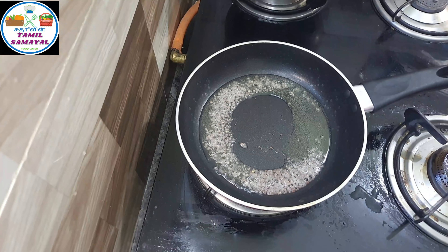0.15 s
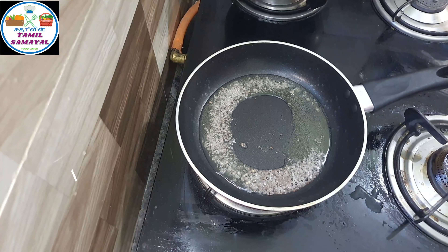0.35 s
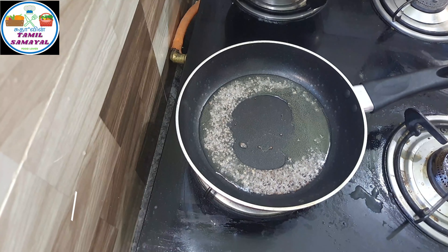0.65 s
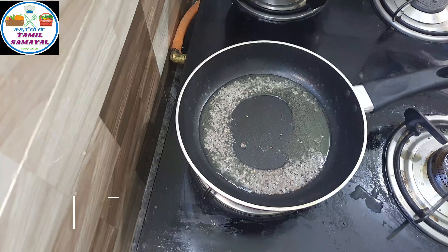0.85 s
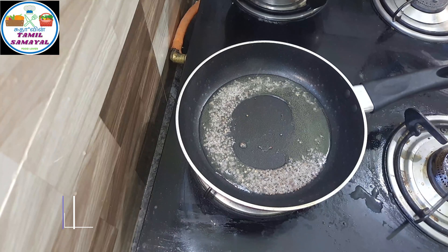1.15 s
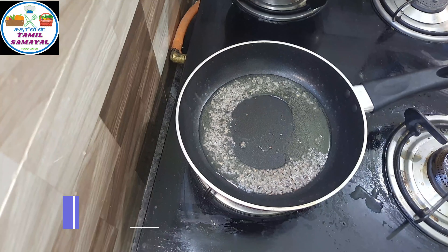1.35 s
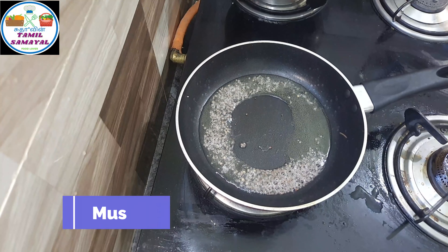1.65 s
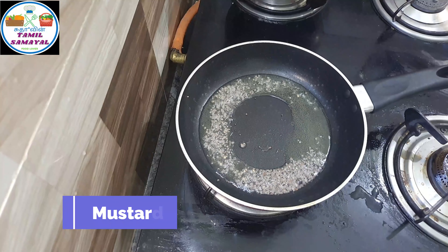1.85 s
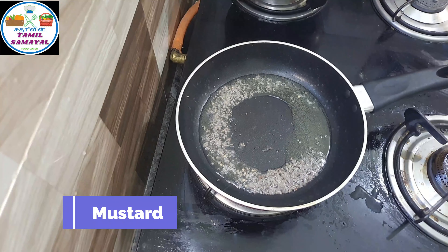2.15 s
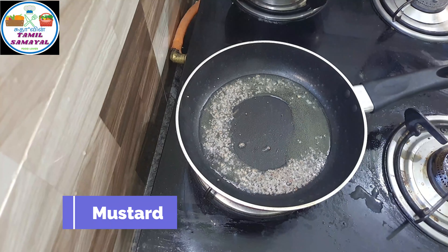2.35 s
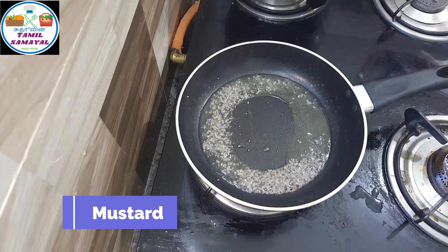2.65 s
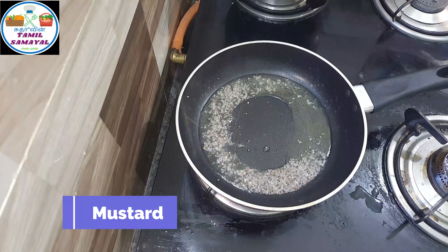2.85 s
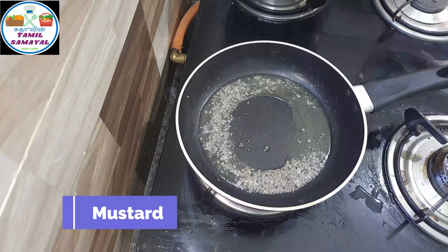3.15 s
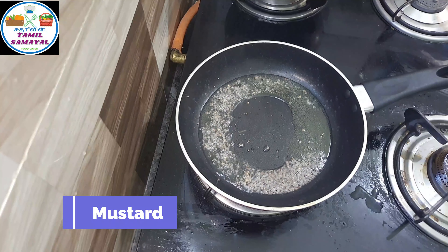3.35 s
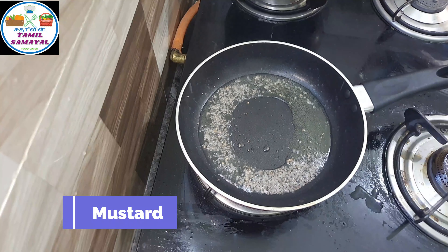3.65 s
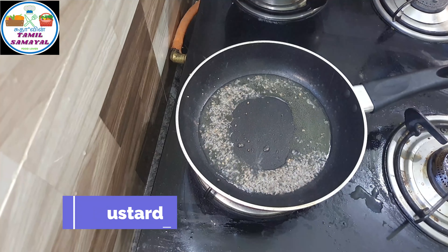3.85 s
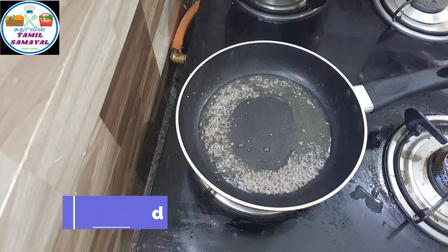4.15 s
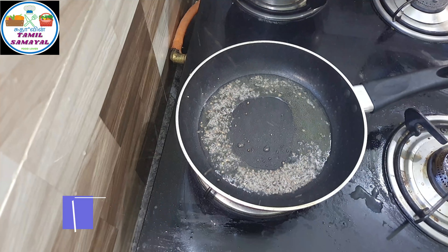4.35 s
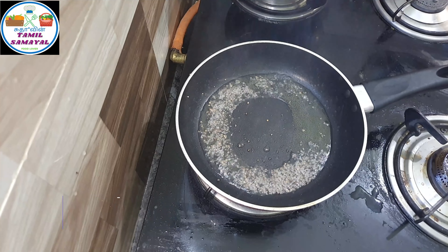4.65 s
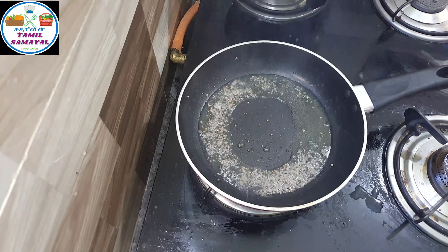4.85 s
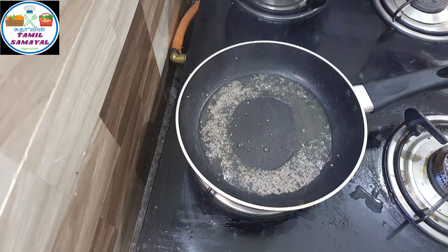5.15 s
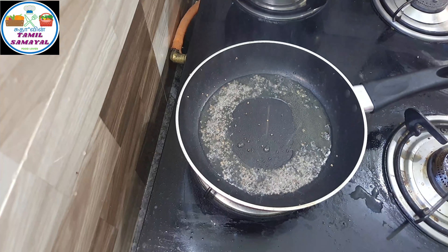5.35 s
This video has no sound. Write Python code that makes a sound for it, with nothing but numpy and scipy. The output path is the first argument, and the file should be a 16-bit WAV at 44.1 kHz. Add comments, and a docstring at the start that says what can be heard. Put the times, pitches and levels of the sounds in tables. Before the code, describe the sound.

In a small, hard-surfaced kitchen, seeds in hot oil start with isolated, brittle pops, a utensil clink near the start and a louder metallic clatter just after one second. The pops come faster through the middle, then merge from about three seconds into dense, loud crackling with oil spits and tiny bubbly plips. Each snap has a short bright room echo. A barely audible burner hums behind. Close phone microphone, identical left and right.

```python
"""Mustard seeds burst in hot oil in a frying pan, close to a phone in a small hard-walled kitchen.
Seeds and crackle: coloured noise snaps, from lone pops to a busy crackle as the oil heats; pops make the oil spit.
Bubbles: short damped sines. Seeds and bubbles echo in decaying noise; the crackle shares one such echo.
Behind: knocked utensils and pan (resonant noise), oil specks on the microphone (tick and thud),
the burner's faint hum and hiss (shaped noise). A fast limiter holds the sharpest peaks."""
import sys
import numpy as np
from scipy import signal
from scipy.fft import rfft, irfft
from scipy.io import wavfile
from scipy.ndimage import uniform_filter1d, minimum_filter1d

SR = 44100
rng = np.random.default_rng(int(sys.argv[2]) if len(sys.argv) > 2 else 0)


def pcm_store(signal):
    """Save signal as 16-bit PCM."""
    levels = np.round(np.clip(np.atleast_2d(signal), -1, 1) * 32767)
    wavfile.write(sys.argv[1], SR, levels.astype(np.int16).T)


N = 242766
# loudest bursting seeds: (time [s], nominal energy per ms [dB], snap pitch [Hz],
# relative room share [dB], high when it bursts away from the phone)
SEED_POPS = [(0.0096, -38.5, 11000, 3.5), (0.0967, -29.5, 15000, -1), (0.1721, -14, 10600, 2),
             (0.4608, -35.5, 7000, 10), (0.535, -40, 11000, 4), (0.6066, -40, 10500, -7),
             (0.667, -44, 6000, 2), (0.6828, -11.0, 6100, -6), (0.712, -20, 4050, 4.5),
             (0.8005, -9.5, 10400, -4), (0.9223, -35.5, 15000, 2), (0.9563, -22.5, 11800, 0),
             (1.0661, -36.5, 14000, 11.5), (1.1468, -15, 10700, 2), (1.1698, -38, 5500, 6),
             (1.2308, -22, 7600, 2.5), (1.3133, -12, 6900, -8), (1.367, -15.5, 6700, 0.5),
             (1.437, -12.5, 9800, -11), (1.4459, -12.5, 5500, 3.5), (1.5203, -20.5, 8900, -1),
             (1.56, -9, 6600, -14), (1.5763, -11.5, 8400, -0.5), (1.6096, -15.5, 8600, -1.5),
             (1.658, -21.5, 7400, 7), (1.7216, -13, 7300, 2), (1.8032, -24.5, 10300, -0.5),
             (1.9273, -7, 8500, -4), (1.9603, -30, 6200, 8), (2.033, -36.5, 8500, 9.5),
             (2.0945, -18, 15000, -2), (2.1257, -14.5, 7700, 1.5), (2.158, -16.5, 5930, 5.5),
             (2.2087, -19.5, 6960, 1.5), (2.2411, -16, 6600, 3), (2.2624, -24, 6200, 3),
             (2.2886, -21.5, 4630, 1), (2.324, -20.5, 7600, 0), (2.343, -18, 8600, -3),
             (2.3585, -25, 6200, -8), (2.4105, -12, 7760, -3), (2.4302, -19.5, 9800, -10),
             (2.4567, -18.5, 7560, -7), (2.4667, -16.5, 7000, 0), (2.4894, -26, 6200, -4),
             (2.5406, -31, 4230, -16), (2.5628, -21.5, 7200, -1), (2.622, -9, 7240, -0.5),
             (2.6976, -17, 6500, -3.5), (2.715, -8.5, 14600, -12), (2.7693, -40, 13000, -17),
             (2.863, -40.5, 7870, 1), (2.8949, -13.5, 5840, -22), (2.905, -13, 7060, 2),
             (2.9311, -17, 9400, -11), (2.96, -16.5, 13500, -11), (2.986, -25, 5600, 7),
             (3.0024, -12.5, 6100, -3.5), (3.0335, -18, 7500, -0.5), (3.0706, -8.5, 8300, -3.5),
             (3.0978, -2, 8260, -15), (3.1084, -10, 8550, -7.5), (3.1475, -8.5, 6200, 0),
             (3.2192, -10, 6400, 0), (3.2351, -16.5, 14000, -10), (3.27, -11.5, 6600, -2.5),
             (3.292, -19, 14000, -15), (3.3351, -25, 3520, 2), (3.3945, -22, 9300, -8),
             (3.4251, -19, 4930, -4), (3.4354, -15.5, 6400, 1.5), (3.4642, -11, 3560, -2.5),
             (3.4778, -14.5, 8660, -8), (3.5041, -7.5, 11700, -9), (3.5232, -5.5, 6400, -10),
             (3.5644, -18.5, 5160, 1), (3.6125, -3, 5740, -7.5), (3.6464, -8, 4140, 0),
             (3.6658, -11, 6100, 2.5), (3.73, -5.5, 7700, -2.5), (3.8164, -10.5, 8240, -1.5),
             (3.906, -10.5, 5760, -1.5), (3.945, -11.5, 5000, 0.5), (4.028, -17, 8600, -7),
             (4.071, -9.5, 8300, -2.5), (4.0969, -17.5, 2940, -12), (4.1074, -4.5, 5370, -4),
             (4.1654, -11.5, 5800, -1.5), (4.1933, -13, 4100, -2), (4.2314, -18.5, 4000, 0),
             (4.2426, -11.5, 7800, -7), (4.2743, -2.5, 7000, -4), (4.2982, -9.5, 6030, 0.5),
             (4.3471, -4, 5450, -6), (4.3819, -15, 6450, -10), (4.3992, -12.5, 7000, 5),
             (4.457, -10, 4950, -6.5), (4.5236, -5, 6070, -5.5), (4.5693, 0.5, 6500, -12.5),
             (4.608, -15, 6250, -8), (4.6392, -8.5, 8600, -4), (4.6691, -14.5, 7460, 4.5),
             (4.705, 1.5, 5200, -8.5), (4.733, -9.5, 12900, -11), (4.7516, -7, 8500, -9),
             (4.7666, -11, 10600, -6), (4.7999, -11, 8600, -14), (4.8436, -16.5, 14300, -1),
             (4.8909, -7.5, 4500, -6.5), (4.905, -1.5, 9400, -7.5), (4.9412, -10, 7700, -20),
             (5.0056, -11.5, 4400, 3), (5.0546, -5.5, 10400, -12), (5.094, -12, 6100, 5.5),
             (5.1185, -0.5, 6800, -16), (5.17, -11.5, 9400, -4), (5.1972, -14.5, 6000, -1),
             (5.224, -9.5, 8500, -17), (5.307, -20.5, 15000, -11), (5.3346, -22.5, 7500, -9),
             (5.3535, -22, 11700, -12), (5.3797, -12.5, 4560, 1.5), (5.3845, -4.5, 9100, -22),
             (5.4023, -13, 11800, -0.5), (5.435, -7.5, 6600, -5.5), (5.4955, -4.5, 7600, 3)]
LEAD_S = 0.004  # room for the faint crack ahead of a snap


def undb(db):
    """Decibels to gain."""
    return 10 ** (np.asarray(db) / 20)


def seconds(length_s):
    """A time axis."""
    return np.arange(int(length_s * SR)) / SR


def burst_level(x, db):
    """Scale a sound so that its energy, packed into one millisecond, has this level."""
    energy_per_ms = np.sum(x ** 2) / (SR / 1000)
    return x * undb(db) / np.sqrt(energy_per_ms + 1e-18)


def add(out, start_s, x):
    """Mix x into out from start_s."""
    i = max(int(start_s * SR), 0)
    part = x[:max(len(out) - i, 0)]
    out[i:i + len(part)] += part


def on_log_axis(hz, points):
    """Read (Hz, value) points on a log-frequency axis."""
    at_hz, value = np.transpose(points)
    return np.interp(np.log(hz + 1), np.log(at_hz), value)


def bins(size):
    """Frequencies of a real transform."""
    return np.fft.rfftfreq(size, 1 / SR)


def burner():
    """The burner's faint hum and hiss: noise with a fixed spectrum and a slowly moving level."""
    # spectrum: (frequency [Hz], relative level [dB])
    spectrum_points = [(25, -53.5), (50, -25), (80, -3.5), (115, -8.5), (190, -20.5), (320, -14.5),
                       (800, -22.5), (1900, -34), (6000, -21), (14000, -27.5)]
    # (time [s], RMS level [dB])
    level_points = [(0, -66.5), (1.4, -61.5), (1.9, -69), (2.8, -70.5), (5.5, -71.5)]
    noise = rfft(rng.standard_normal(N))
    flame = irfft(noise * undb(on_log_axis(bins(N), spectrum_points)), N)
    level_db = np.interp(np.arange(N) / SR, *np.transpose(level_points))
    return flame / flame.std() * undb(level_db)


def knocked_things(rise_s=0.0066, size=32768):
    """Utensils and pan knocked: a short rattle into their resonances, drawn out by the room."""
    # (time [s], nominal level [dB], rattle length [s], set of resonances)
    # utensils beside the stove; the last row is a short, low knock of the pan under the tick, on the cup's set
    knocks = [(0.4, -68, 0.028, "cup"), (0.472, -29, 0.016, "cup"), (0.719, -48, 0.024, "cup"),
              (0.748, -35.5, 0.031, "cup"), (1.083, -56.5, 0.026, "cup"), (1.242, -15.5, 0.033, "lid"),
              (2.305, -39.5, 0.063, "board"), (4.602, -40, .002, "cup")]
    # resonances by set, the wide ones clatter: (frequency [Hz], half-amplitude width [Hz], gain [dB])
    resonances = {"cup": [(461, 28, -9.5), (540, 44, -8.5), (952, 260, 0.5), (1277, 260, 3.5),
                  (1610, 260, -1.5), (2260, 2300, -13.5), (2970, 470, -7.5), (5600, 3000, -11.5),
                  (10200, 160, -6)], "lid": [(250, 69, -25), (500, 115, -39), (815, 120, 1.5),
                  (1013, 274, 1.5), (1493, 330, -5.5), (1870, 120, 3.5), (2520, 1000, -4.5),
                  (3430, 460, -5.5), (4110, 1700, -6), (5400, 580, -7), (7060, 3300, -12),
                  (12500, 3770, -16.5)], "board": [(109, 22, -4), (284, 28, -4.5), (449, 27, 2.5),
                  (644, 170, -7), (870, 42, 1.5), (1070, 640, -5)]}
    # 60 dB decay after the rattle, by set [s]
    ring_t60_s = {"cup": .28, "lid": .28, "board": .17}
    out, t, hz = np.zeros(N), np.arange(size) / SR, bins(size)
    for start_s, db, rattle_s, ring_set in knocks:
        power = np.zeros(len(hz))
        for f, width_hz, gain_db in resonances[ring_set]:
            power += undb(2 * gain_db) / (1 + ((hz - f) / (width_hz / 2)) ** 2) ** 2
        ring = irfft(np.sqrt(power) * np.exp(2j * np.pi * rng.random(len(hz))))
        decay = np.exp(-np.log(1000) * np.maximum(t - rattle_s, 0) / ring_t60_s[ring_set])
        shape = np.minimum(t / rise_s, 1) * decay
        knock = shape * ring
        add(out, start_s, undb(db) * knock * shape.std() / knock.std())
    return out


def droplet(tick_s=0.000086):
    """A speck of oil lands on the microphone: a hard tick, then a blunt, quickly damped thud."""
    # (time [s], tick envelope peak [dB], thud envelope peak [dB])
    landings = [(2.1547, 40, -20.5), (4.606, -21.5, -55)]
    out, t = np.zeros(N), seconds(0.15)
    thud_hz, thud_s, delay_s = 66, 0.0062, 0.0016
    tick_age, thud_age = t / tick_s, t / thud_s
    tick = -tick_age * np.exp(1 - tick_age) * np.cos(tick_age / 2)
    thud = np.sin(2 * np.pi * thud_hz * t) * thud_age * np.exp(1 - thud_age)
    for start_s, tick_db, thud_db in landings:
        add(out, start_s, undb(tick_db) * tick)
        add(out, start_s + delay_s, undb(thud_db) * thud)
    return out


def kitchen(build_s=0.015, early=0.17, size=16384):
    """Echo of the room from one spot in the pan: a short gap, then dense reflections that die away."""
    # decay by band: (lowest frequency [Hz], 60 dB decay [s])
    decays = [(0, 0.28), (2000, 0.23), (4500, 0.26), (9000, 0.27)]
    t, hz = np.arange(size) / SR, bins(size)
    noise = rfft(rng.standard_normal(size))
    tops_hz = [lo for lo, _ in decays[1:]] + [SR]
    tail = np.zeros(size)
    for (lo, t60_s), hi in zip(decays, tops_hz):
        band = irfft(noise * (hz >= lo) * (hz < hi))
        tail += band * np.exp(-np.log(1000) * t / t60_s)
    tail *= np.minimum(early + (t / build_s) ** 2, 1) * (t > 0.002)
    return tail / np.sqrt(np.sum(tail ** 2))


def coloured(x, band_db):
    """Give a crack the colour of the pan and its own strength in each band."""
    # band edges: (low [Hz], high [Hz])
    band_edges = [(100, 4300), (4300, 8500), (8500, 14500)]
    # colour of a burst in the pan, before the bands are levelled: (frequency [Hz], gain [dB])
    pan_colour = [(200, -46), (600, -39), (850, -29), (1250, -13), (1700, -6.5), (3100, 1.5), (4500, 3),
                  (6300, 6), (9000, 2.5), (12500, 9), (16000, 1.5)]
    hz, out = bins(len(x)), np.zeros(len(x))
    spectrum = rfft(x) * undb(on_log_axis(hz, pan_colour))
    for (lo, hi), db in zip(band_edges, band_db):
        mask = 1 / (1 + (hz / hi) ** 12) - 1 / (1 + (hz / lo) ** 12)
        out += burst_level(irfft(spectrum * mask), db)
    return out


def snap_bands(db, pitch_hz, fall_db=5):
    """Share a snap's energy among the bands: fall_db less one octave off its pitch, four times that at two."""
    # the bands of a burst: (centre [Hz], how well the pan radiates it, relative [dB])
    pan_bands = [(3000, 1.5), (6200, -2.5), (11500, 1)]
    centre_hz, pan_db = np.transpose(pan_bands)
    band_db = pan_db - fall_db * np.log2(centre_hz / pitch_hz) ** 2
    return db + band_db - 10 * np.log10(np.sum(undb(band_db) ** 2))


def echo_ripple(size, ripple_db=3.04, width_hz=600):
    """Each pop's echo has its own random ripples: a gain for each frequency."""
    points_hz = np.arange(0, SR / 2 + width_hz, width_hz)
    ripple = rng.standard_normal(len(points_hz))
    return undb(ripple_db * np.interp(bins(size), points_hz, ripple))


def burst(band_db, snap_s=0.00011, pan_s=0.0053, pan_db=-18, split_s=0.0013, split_db=-14, vary_db=4, size=768):
    """A husk cracks faintly, then snaps open in a few cycles; reflections rattle briefly inside the pan."""
    t = np.arange(size) / SR - LEAD_S
    length_s = snap_s * undb(vary_db * rng.uniform(0.1, 1))
    lead_s = split_s * rng.uniform(0.33, 1.6)  # the crack comes this much ahead
    age = np.maximum([t, t + lead_s], 0) / length_s
    snap, crack = age * np.exp(1 - age)
    rattle = np.exp(-np.abs(t) / pan_s) * (t > 0)
    crack_gain = undb(split_db + vary_db * rng.standard_normal())
    shape = snap + crack_gain * crack + undb(pan_db) * rattle
    return coloured(shape * rng.standard_normal(size), band_db)


def crackle(rooms, scatter_db=5, pitch_hz=7000, spread_octaves=0.44, room_db=-6):
    """Small bursts at random moments, more and louder as the oil heats up, and a flurry of spits after each pop."""
    # bursts all over the pan: (time [s], rate [1/s], typical level [dB])
    heating = [(0, 3, -60), (1.1, 8, -52), (2.85, 10, -55.5), (3.1, 70, -34), (4.1, 90, -30.5),
               (4.7, 120, -28), (5.5, 90, -29)]
    spits_per_pop, spit_delay_s, spit_db = 2, 0.03, -21  # means once hot; level against the pop
    hot_s = 1.4  # oil spits freely from here
    ceiling_db = 11  # strongest burst above the typical one
    s, rate, db = np.transpose(heating)
    t, out = np.arange(N) / SR, np.zeros(N)
    starts_s = t[rng.random(N) < np.interp(t, s, rate) / SR]
    bursts = [(at, np.interp(at, s, db)) for at in starts_s]
    for at, pop_db, *_ in SEED_POPS:
        spits = rng.poisson(spits_per_pop * min(at / hot_s, 1) ** 2)
        for delay_s in rng.gamma(2, spit_delay_s / 2, spits):
            bursts.append((at + delay_s, pop_db + spit_db))
    for at, typical_db in bursts:
        strength, pitch = rng.standard_normal(2)
        burst_db = typical_db + min(scatter_db * strength, ceiling_db)
        burst_hz = pitch_hz * 2 ** (spread_octaves * pitch)
        add(out, at, burst(snap_bands(burst_db, burst_hz)))
    return out + undb(room_db) * signal.fftconvolve(out, rooms[0])[:N]


def bubbles(rooms, lag_s=0.001816, after=0.36, spread=0.09, direct_db=0.1, room_db=2.0, count=2):
    """A steam pocket rings for a few cycles; smaller pockets split off it and ring at nearby pitches."""
    # bubbles ringing in the oil: (time [s], nominal energy per ms [dB], pitch [Hz], relative room share [dB])
    plips = [(0.0105, -30.5, 3340, -6), (0.1683, -17, 3030, -2), (0.6822, -12, 3120, -6.5),
             (1.4626, -12, 2780, -7.5), (1.6615, -12, 3300, -10), (2.0672, -36, 3360, -2),
             (2.4039, -10, 3440, -9), (2.4336, -19.5, 2820, -6), (3.1517, -9.5, 3450, -9.5),
             (3.8261, -17, 3410, -7), (3.8698, -10.5, 2800, -7), (4.5283, -6, 3000, -9),
             (4.5532, -4, 2760, -7), (4.7324, -5, 3200, -7), (4.8662, -5.5, 2790, -4.5),
             (5.0072, -6.5, 3230, -8), (5.0488, -6.5, 3040, -1), (5.0629, -4.5, 3030, -8),
             (5.1112, -9.5, 3670, -8), (5.2437, -14.5, 3570, -9), (5.31, -18.5, 2860, -5.5)]
    out, t = np.zeros(N), seconds(0.012)
    rise_s = 0.00025
    ring_0db_s, ring_growth = 0.0002, 1  # time constant at 0 dB; its growth [dB per dB fainter]
    longest_s = 0.0015  # the oil damps even the gentlest bubble
    no_bass = signal.butter(4, 1500, "high", fs=SR, output="sos")  # pockets this small radiate no lows
    for k, (start_s, db, hz, share_db) in enumerate(plips):
        ring_s = min(ring_0db_s * undb(-ring_growth * db), longest_s)
        shape = (1 - np.exp(-t / rise_s)) * np.exp(-t / ring_s)
        ring = signal.sosfilt(no_bass, np.sin(2 * np.pi * hz * t) * shape)
        cluster = ring.copy()
        for j in range(count):
            pocket_hz = hz * (1 + spread * (-1) ** (j + k) * rng.uniform(0.17, 1.5))
            pocket = signal.sosfilt(no_bass, np.sin(2 * np.pi * pocket_hz * t) * shape)
            add(cluster, lag_s * (j + rng.uniform(0.5, 1)), after * pocket)
        add(out, start_s, burst_level(cluster, db + direct_db))
        # the walls hold on to the main pitch
        to_room = burst_level(ring, db + room_db + share_db)
        add(out, start_s, signal.fftconvolve(to_room, rooms[k % len(rooms)]))
    return out


def seeds(rooms, direct_db=2.44, room_db=-2.27, rise_s=0.00025, size=768):
    """The loud pops: a noise snap each, and a rippled echo from one of a few spots in the pan."""
    out, click = np.zeros(N), signal.unit_impulse(size, int(LEAD_S * SR))
    for k, (snap_at_s, db, hz, share_db) in enumerate(SEED_POPS):
        band_db, start_s = snap_bands(db, hz), snap_at_s - LEAD_S - rise_s
        add(out, start_s, undb(direct_db) * burst(band_db))
        # the echo keeps the pop's broad colour, with random ripples of its own
        to_room = coloured(irfft(rfft(click) * echo_ripple(size)), band_db)
        echo = signal.fftconvolve(to_room, rooms[k % len(rooms)])
        add(out, start_s, undb(room_db + share_db) * echo)
    return out


def scene(count=12):
    """Everything reaches one microphone, the same left and right."""
    rooms = [kitchen() for _ in range(count)]
    background = burner() + knocked_things() + droplet()
    mono = background + crackle(rooms) + bubbles(rooms) + seeds(rooms)
    return np.array([mono, mono])


def record(dry, size=33):
    """The phone's fast limiter holds down the tallest peaks; then the top is cut."""
    ceiling, top_hz = 0.84, 14150
    gain = minimum_filter1d(ceiling / np.maximum(np.abs(dry), ceiling), 2 * size - 1)
    gain = uniform_filter1d(uniform_filter1d(gain, size), size)
    low_pass = signal.ellip(8, 0.2, 70, top_hz, fs=SR, output="sos")
    return signal.sosfilt(low_pass, dry * gain)


dry = scene()
out = record(dry)
pcm_store(out)
```